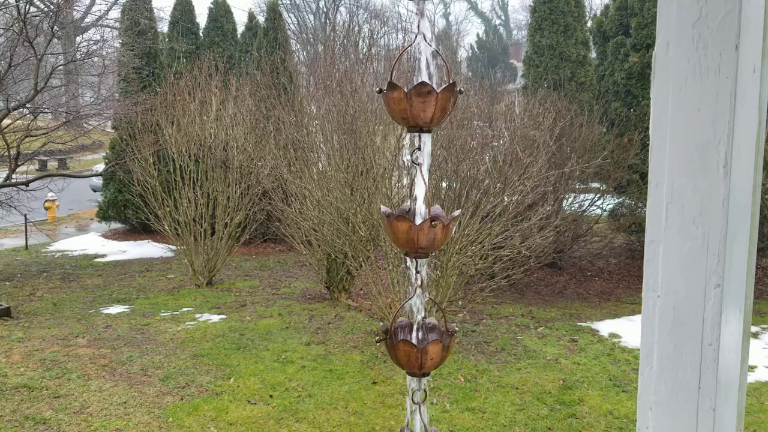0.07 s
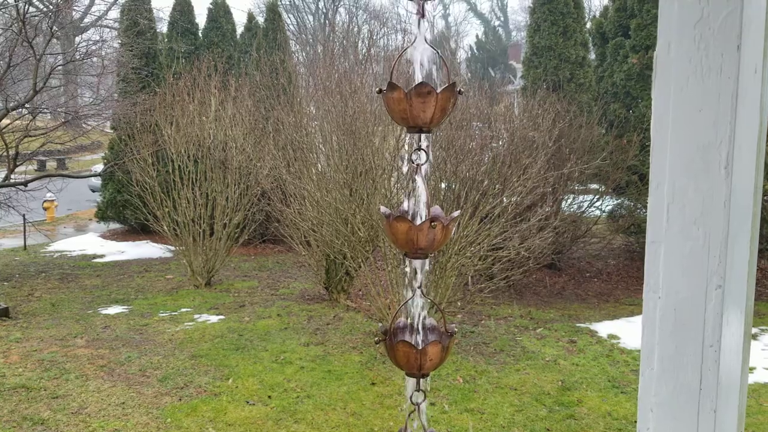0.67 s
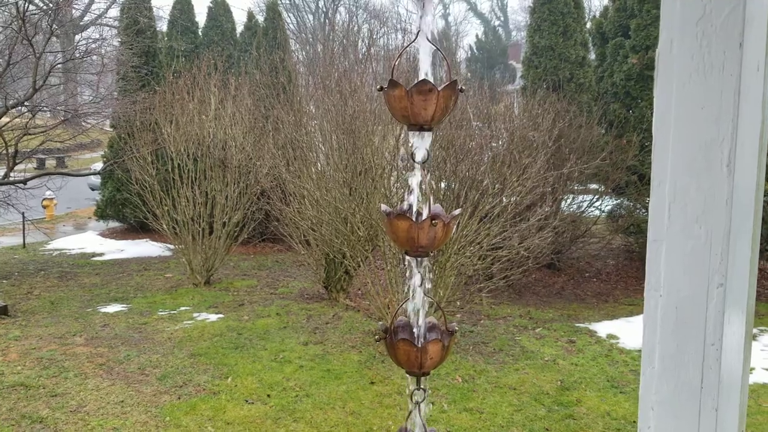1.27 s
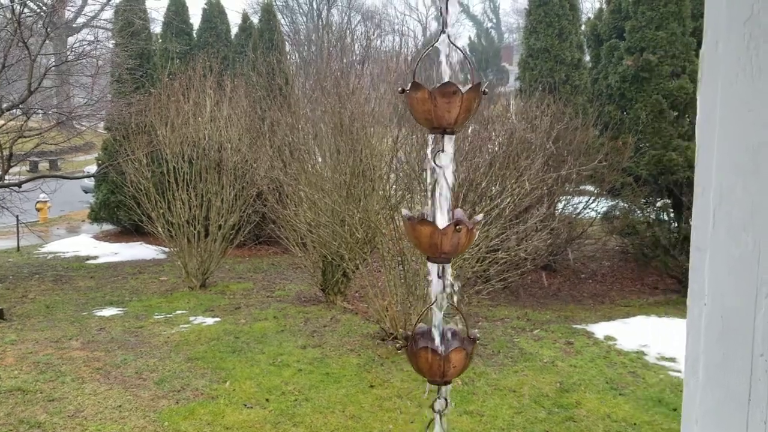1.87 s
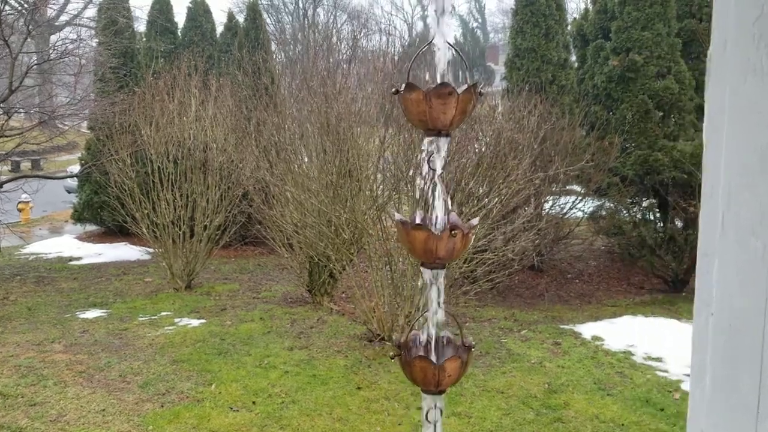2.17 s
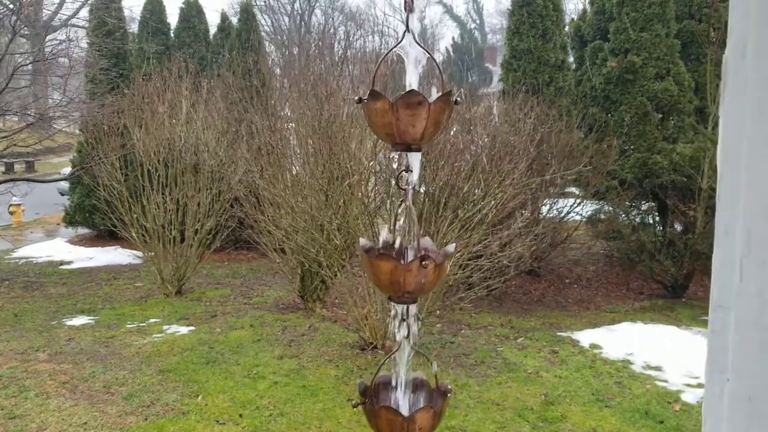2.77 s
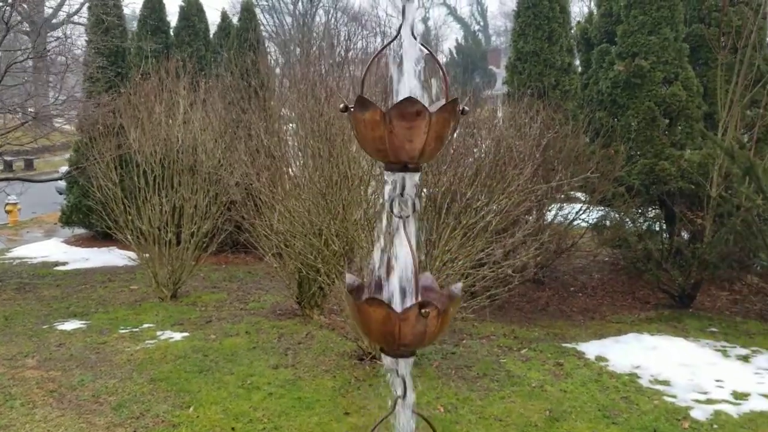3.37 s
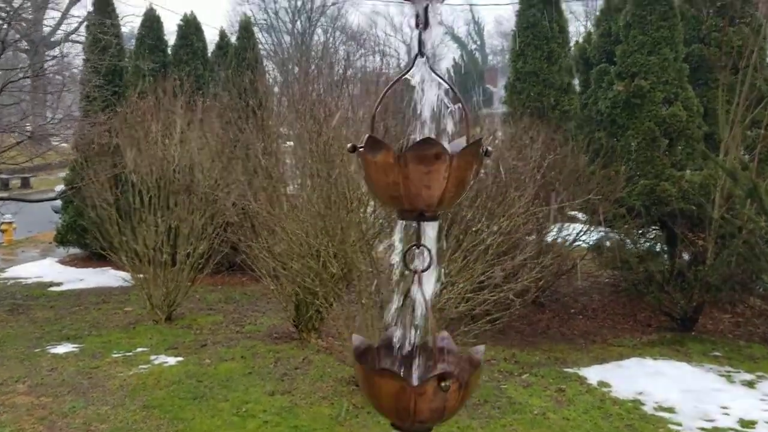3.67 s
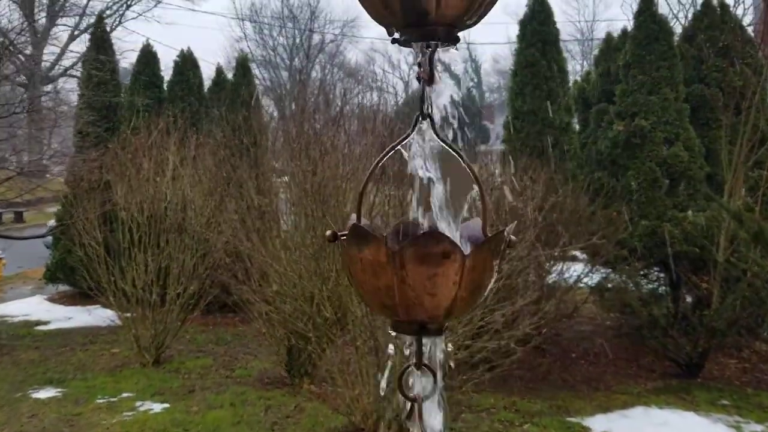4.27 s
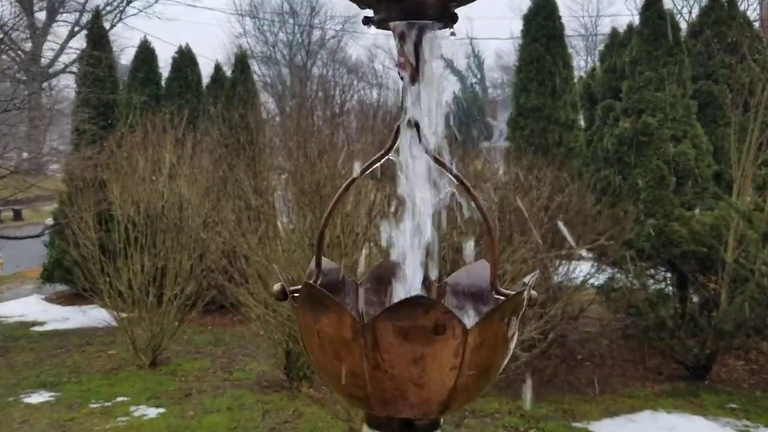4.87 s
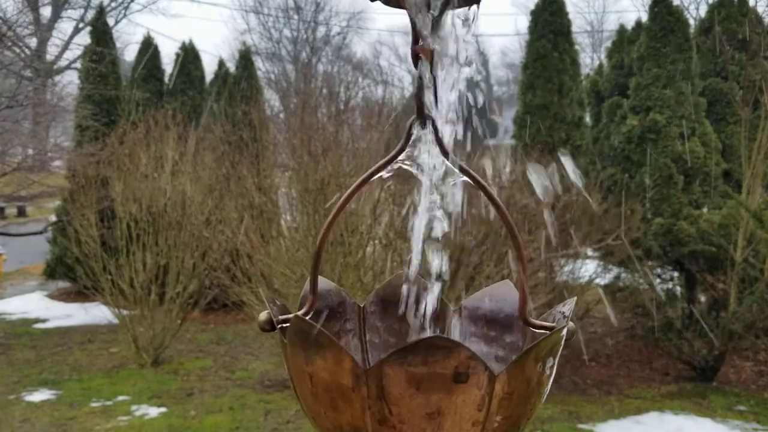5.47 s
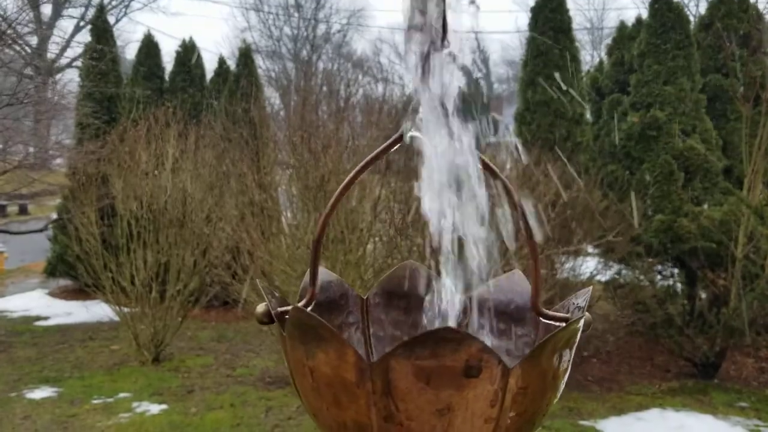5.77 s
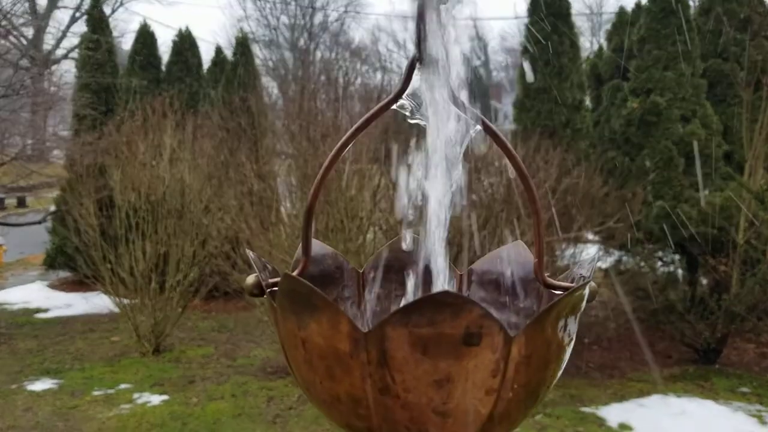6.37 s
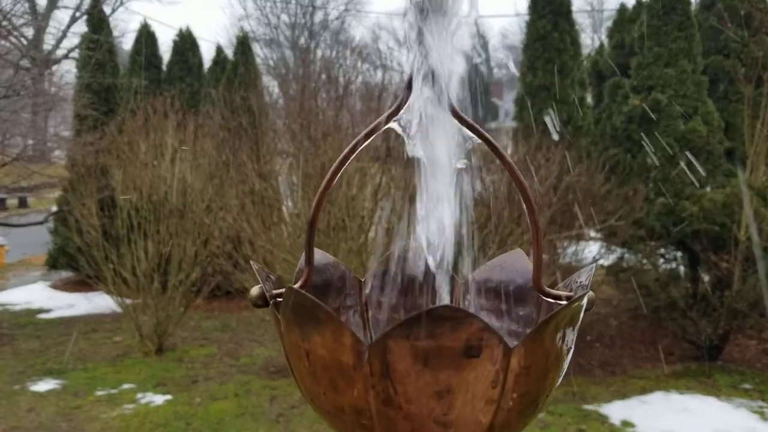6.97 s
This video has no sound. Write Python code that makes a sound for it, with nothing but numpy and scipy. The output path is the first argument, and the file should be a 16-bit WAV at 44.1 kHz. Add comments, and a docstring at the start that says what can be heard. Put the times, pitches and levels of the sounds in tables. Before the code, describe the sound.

A steady stream splatters and bubbles through metal rain chain cups in light rain, with small plinks and a few drops knocking the microphone.

```python
"""Copper rain chain

Roof water pours down a chain of copper cups in light rain; the microphone moves up close to one cup.
The stream churns bubbles in the cups, throws off fizzing spray and keeps the copper faintly ringing.
A few stray drops knock on the microphone's housing, over a low outdoor rumble."""
import sys
import numpy as np
from scipy import signal
from scipy.fft import rfft, irfft
from scipy.io import wavfile
from scipy.ndimage import uniform_filter1d

SR = 44100
rng = np.random.default_rng(int(sys.argv[2]) if len(sys.argv) > 2 else 0)


def master(y):
    """Save y as 16-bit WAV."""
    cut = np.clip(np.atleast_2d(y).T, -1, 1)
    pcm = np.round(cut * 32767)  # scale
    wavfile.write(sys.argv[1], SR, pcm.astype(np.int16))


N = 309141
TIME_S = np.arange(N) / SR
FREQ_HZ = np.fft.rfftfreq(N, 1 / SR)

# Walk up to the cup. Each row: time in seconds, nearness from 0 to 1.
NEARNESS = [(0, 0.4), (2.4, 0.38), (3.6, 0.91), (5, 1), (7, 1)]
# Outdoor rumble. Each row: time in seconds, relative level in dB.
RUMBLE_DB = [(0.3, -46.5), (0.65, -47.5), (0.88, -47.5), (2.91, -44.5), (3.43, -47), (5.64, -49),
             (7.0, -48.5)]
# Steady run of water. Each row: time in seconds, relative spray and churn levels in dB.
FLOW_DB = [(0.3, -35.5, -40.5), (0.43, -34.5, -41), (1.68, -38, -42.5), (2.09, -34.5, -39.5),
           (3.19, -36.5, -43), (3.79, -31, -39), (4.24, -32.5, -40.5), (4.93, -30.5, -38),
           (5.97, -32.5, -41.5), (6.51, -31, -40.5), (7.0, -33.5, -39.5)]
# Source spectra. Each row: frequency in Hz, relative density in dB.
YARD_DB = [(20, -20), (38, -13), (54, 0.5), (70, -1), (120, -4), (180, -9), (280, -14.5), (500, -19),
           (1000, -20.5), (2500, -23), (8000, -28)]
CHURN_DB = [(300, -15), (700, -16), (1200, -8.5), (1700, -11), (2200, -2), (3200, -1.5), (4400, -1),
            (6000, 0), (9000, -19.5)]
SPRAY_FAR_DB = [(2000, -55), (4000, -5.5), (5500, -11), (7200, -8), (8800, -5.5), (10500, -4), (11800, 2),
                (12900, -2.5), (14000, -7), (15700, -12)]
SPRAY_NEAR_DB = [(1000, -15), (2500, -13.5), (5000, -28), (6300, -2.5), (7200, -6.5), (8000, -3),
                 (8450, -3.5), (9300, -1), (10800, 0), (12700, 4), (14000, 1), (15700, -5.5)]
# Splash colour. Each row: frequency in Hz, gain in dB.
SPLASH_EQ_DB = [(800, 2), (2500, 0), (5000, -1.5), (8500, 2), (10500, -1.5), (12700, 6.5), (15700, -2.5)]
# Stereo balance. Each row: frequency in Hz, left over right in dB.
PAN_FAR_DB = [(100, 0), (700, 5.5), (2000, 2), (4000, -2), (6700, 8.5), (8500, 2), (10000, 3.5),
              (11500, 10), (13300, 17.5), (15200, -2)]
PAN_NEAR_DB = [(100, 1.5), (700, 3), (2000, -1), (3800, 4), (5200, 2.5), (6200, -2), (7400, 1),
               (8700, -9.5), (10000, 2), (11500, -3), (13000, 4.5), (15200, -11)]
# Likeness of the channels. Each row: frequency in Hz, correlation.
CORRELATION = [(100, 0.96), (300, 0.89), (700, 0.54), (1450, -0.067), (2300, .72), (4000, 0.35),
               (6000, 0.11), (8000, -0.036), (16000, -0.066)]
# Drops on the housing. Each row: start in seconds, pitch in Hz, pop level in dB, spatter level in dB.
KNOCKS = [(1.517, 560, -26.5, -50), (1.995, 580, -29, -50), (2.308, 530, -28, -50), (2.698, 537, -28, -50),
          (2.7584, 590, -11.5, -24), (2.7616, 1210, -11.5, -34), (2.764, 1640, -9, -8.5),
          (4.62, 1300, -30, -45), (5.4076, 1220, -14, -40)]
# Loud plinks: bubbles and a few brief rings of the struck copper cup.
# Each row: start in seconds, pitch in Hz, level in dB, t60 in seconds, roughness from 0 to 1.
LOUD_PLINKS = [(.449, 4260, -28, 0.12, 0.3), (0.688, 5100, -24, 0.027, .95), (.837, 2380, -35, .05, 0.1),
               (.897, 3980, -33.5, 0.18, 0.1), (.908, 2080, -32.5, 0.066, 0.7),
               (.965, 2710, -32.5, .06, .6), (1.412, 4470, -33, 0.37, .8), (1.755, 1740, -39.5, 0.13, 0.04),
               (1.769, 3000, -33.5, 0.088, .5), (2.012, 2950, -33, 0.1, .5), (2.09, 1730, -38, .08, 0),
               (2.152, 4900, -29, .15, .95), (2.632, 4900, -29.5, .07, .6), (2.917, 1820, -35.5, .086, 0.7),
               (3.078, 2260, -24, 0.037, .3), (3.089, 3700, -34, .06, .4), (3.204, 5020, -29.5, 0.055, 0.3),
               (3.867, 6080, -25, 0.1, 0.5), (3.93, 2180, -27, 0.035, 0.05), (4.325, 6550, -28.5, 0.2, 0.9),
               (4.702, 4300, -27, 0.086, 0.6), (5.482, 3320, -24, 0.022, .7), (5.776, 2800, -32.5, .07, .6),
               (5.896, 6140, -26.5, .08, .3), (6.075, 2900, -33, 0.039, 0.8),
               (6.182, 4780, -29, 0.052, 0.7), (6.275, 6600, -21, 0.051, .6),
               (6.284, 6170, -23.5, 0.1, 0.3), (6.459, 2060, -31, .035, 0.1),
               (6.501, 4780, -27, 0.17, 0.14), (6.548, 4800, -25.5, 0.13, 0.36),
               (6.638, 2860, -32.5, .055, .7)]
# Droplets on the rims. Each row: start in seconds, relative level in dB, low edge in Hz.
RIM_TICKS = [(.6878, -24, 3800), (1.259, -24, 3000), (2.3934, -20, 11000), (3.7553, -17.5, 9000),
             (4.4732, -22, 8000), (4.76, -23, 7000), (4.781, -17.5, 3800), (5.2649, -16.5, 4000),
             (5.3247, -17, 5000), (5.421, -13, 7000), (6.0042, -19.5, 6000), (6.3694, -21, 5000),
             (6.4607, -20, 1800), (6.5235, -16.5, 7000), (6.549, -21, 1500)]
# Bursting gouts. Each row: start in seconds, relative level in dB, t60 in seconds, low edge in Hz.
SPLASHES = [(0.413, -28, 0.13, 3300), (0.699, -21.0, 0.18, 6900), (0.958, -27, 0.25, 3500),
            (1.261, -22, 0.28, 2940), (1.318, -25, 0.16, 2500), (1.421, -29.5, 0.25, 4000),
            (1.544, -26.5, 0.54, 5500), (1.904, -28, 0.1, 5000), (1.993, -34, 0.3, 2800),
            (2.125, -33, 0.67, 2980), (2.323, -25.5, 0.091, 1800), (2.55, -29.5, 0.86, 2980),
            (2.915, -28, 0.7, 7040), (3.044, -28, 0.32, 6000), (3.219, -24, 0.23, 8100),
            (3.296, -25, 0.32, 2660), (3.374, -28, 0.64, 3000), (3.67, -23.0, 0.11, 2500),
            (3.827, -21.5, 0.26, 3800), (4.649, -19, 0.08, 5000), (4.817, -23, 0.21, 7050),
            (4.916, -30, 0.98, 6000), (5.263, -24, 0.58, 5500), (5.328, -25, 0.29, 6000),
            (5.422, -29, 0.27, 7000), (5.553, -25, 0.38, 6000), (5.639, -21.5, 0.26, 3000),
            (5.733, -29.5, 0.54, 2500), (5.847, -20, 0.36, 5470), (5.964, -24, 0.15, 3000),
            (6.073, -25, 0.3, 2500), (6.27, -17.5, 0.17, 5330), (6.388, -16.5, 0.13, 2430),
            (6.512, -18.0, 0.26, 4900), (6.638, -22.5, 0.13, 2600), (6.72, -24.5, 0.47, 5500),
            (6.893, -24, 0.14, 3000), (6.933, -22, 0.2, 6500)]
# Copper cup modes. Each row: frequency in Hz, bandwidth in Hz, relative level in dB.
CUP_MODES = [(891, 10, -63), (1245, 12, -60), (1357, 22, -59), (1505, 12, -65), (1826, 10, -64),
             (4361, 30, -59), (4793, 22, -55), (5089, 25, -61), (6178, 45, -55), (7381, 30, -61),
             (8584, 50, -57)]


def gain_of(db):
    """Decibels to amplitude."""
    return 10 ** (np.asarray(db) / 20)


def unit_rms(x):
    """Scales to rms 1."""
    return x / np.sqrt(np.mean(x ** 2) + 1e-20)


def per_bin(table):
    """A spectrum table at every FFT bin, interpolated in log frequency."""
    hz, value = np.transpose(table)
    return np.interp(np.log(FREQ_HZ + 1), np.log(hz), value)


def per_sample(table, column=1):
    """A control table column at every sample."""
    rows = np.array(table)
    return np.interp(TIME_S, rows[:, 0], rows[:, column])


def add(mix, start_s, sound):
    """Mixes a sound in place."""
    part = mix[:, round(start_s * SR):][:, :sound.shape[-1]]
    part += sound[..., :part.shape[1]]


def highpass(x, hz):
    """Third-order Butterworth."""
    return signal.sosfilt(signal.butter(3, hz, "high", fs=SR, output="sos"), x)


def pan(left_db):
    """Channel gains for a level difference."""
    return gain_of(np.array([[.5], [-.5]]) * left_db)


def splash_pan(start_s, far_db=5, near_db=-1.5, scatter_db=2.5):
    """Splashes land around the chain, which drifts from left to about centre along the walk."""
    near = np.interp(start_s, *np.transpose(NEARNESS))
    return pan(far_db + (near_db - far_db) * near + scatter_db * rng.standard_normal())


def stereo(pair, spectrum_db, pan_db):
    """Two unrelated signals become mid and side of a coloured sound, mid at rms 1."""
    mid, side = rfft(pair) * gain_of(per_bin(spectrum_db))
    correlation = per_bin(CORRELATION)
    side = side * np.sqrt((1 - correlation) / (1 + correlation))
    out = irfft(np.array([mid + side, mid - side]) * pan(per_bin(pan_db)), N)
    return out / out.mean(0).std()


def approach(pair, far_db, near_db):
    """Crossfades far to near spectrum and balance along the walk."""
    near = per_sample(NEARNESS)
    return (1 - near) * stereo(pair, far_db, PAN_FAR_DB) + near * stereo(pair, near_db, PAN_NEAR_DB)


def impacts(per_s, spread_db):
    """Random impulses: many small, a few large."""
    return (rng.random(N) < per_s / SR) * gain_of(spread_db * np.minimum(rng.exponential(1, N), 4))


def bursts(per_s, spread_db, t60_s):
    """Envelope of overlapping bursts: instant rise, exponential decay."""
    pole = np.exp(-2 * np.log(1000) / (t60_s * SR))
    return unit_rms(np.sqrt(signal.lfilter([1], [1, -pole], impacts(per_s, spread_db) ** 2)))


def sparkle(x, per_s, spread_db, t60_s, share):
    """Each small splash briefly favours its own band."""
    spectra = signal.stft(x, nperseg=256, noverlap=192)[2]
    shape, frames_per_s = spectra.shape[1:], SR / 64
    hits = rng.random(shape) < per_s / frames_per_s / shape[0]
    power = hits * gain_of(spread_db * np.minimum(rng.exponential(1, shape), 3)) ** 2
    power = uniform_filter1d(uniform_filter1d(power, size=7, axis=0), size=4, axis=0)
    pole = np.exp(-2 * np.log(1000) / (t60_s * frames_per_s))
    power = abs(signal.lfilter([1], [1, -pole], power))
    gain = np.sqrt(1 - share + share * power / power.mean())
    return signal.istft(spectra * gain, nperseg=256, noverlap=192)[1][:, :N]


def ping(hz, t60_s, rise):
    """Damped tone of climbing pitch, as of an air pocket nearing the surface."""
    t = np.arange(int(t60_s * SR) + 2) / SR
    envelope = gain_of(-60 * t / t60_s) * (1 - np.exp(-t * hz / 0.83))
    return envelope * np.sin(2 * np.pi * hz * t * (1 + rise * t / t60_s))


def yard():
    """Low outdoor rumble, with soft rain patter on the ground."""
    patter = bursts(per_s=140, spread_db=2.5, t60_s=0.078) * rng.standard_normal((2, N))
    wash = rng.standard_normal((2, N)) + 0.84 * highpass(patter, hz=260)
    return gain_of(per_sample(RUMBLE_DB) + 4.5) * approach(wash, YARD_DB, YARD_DB)


def swell(peak_s=0.69, width_s=0.09, level_db=-42.5, centre_hz=58, width_hz=22):
    """One deep swell of the rumble, alike on both sides."""
    band = np.exp(-((FREQ_HZ - centre_hz) / width_hz) ** 2)
    deep = unit_rms(irfft(rfft(rng.standard_normal(N)) * band, N))
    return gain_of(level_db) * np.exp(-((TIME_S - peak_s) / width_s) ** 2) * deep


def knocks(thump_hz=155):
    """Drops hit the housing: hollow pop and brief spatter, almost all on the left."""
    out, t = np.zeros((2, N)), np.arange(SR // 30) / SR
    for start_s, hz, pop_db, spatter_db in KNOCKS:
        age = t * hz / .45
        pop = -gain_of(pop_db) * age * np.exp(1 - age) * np.sin(2 * np.pi * hz * t)
        decay = np.exp(-t / 0.00059) + 0.09 * np.exp(-t / 0.0029)
        spatter = gain_of(spatter_db) * decay * highpass(rng.standard_normal(len(t)), hz=3500)
        # The whole housing gives a little.
        thump = gain_of(pop_db - 12) * np.sin(2 * np.pi * thump_hz * t) * np.exp(-t / 0.003)
        add(out, start_s, (pop + thump + spatter) * np.array([[1], [.04]]))
    return out


def plinks(small_per_s=8, small_db=-34.5, small_t60_s=0.037, low_hz=2100, high_hz=7480):
    """Single bubbles, clean in still water, rough when they break up; a few rings of the struck cup."""
    out = np.zeros((2, N))
    waits, pitches, roughnesses = rng.random((100, 3)).T
    starts_s = np.cumsum(2 * waits / small_per_s)
    small_bubbles = [(start_s, low_hz * (high_hz / low_hz) ** pitch, small_db, small_t60_s, roughness)
                     for start_s, pitch, roughness in zip(starts_s, pitches, roughnesses)]
    for start_s, hz, db, t60_s, roughness in LOUD_PLINKS + small_bubbles:
        ring = ping(hz, t60_s, rise=0.023)
        flutter = uniform_filter1d(uniform_filter1d(rng.standard_normal((3, SR // 2)), 32), 20)
        shared, left, right = unit_rms(flutter)[:, :len(ring)]
        rasp = .8 * shared + .9 * np.array([left, right])
        add(out, start_s, gain_of(db) * ring * (np.sqrt(1 - roughness) + np.sqrt(roughness) * rasp))
    return out


def splashes():
    """Hard droplets crack on the rims; gouts burst in a longer, grainy spatter."""
    ticks, gouts, t = np.zeros((2, N)), np.zeros((2, N)), np.arange(SR // 2) / SR
    crack = 1.3 * gain_of(-60 * t / .007) + .7 * gain_of(-60 * t / .02)
    for start_s, db, edge_hz in RIM_TICKS:
        envelope = gain_of(db) * crack * splash_pan(start_s)
        add(ticks, start_s, envelope * highpass(rng.standard_normal((2, len(t))), edge_hz))
    for start_s, db, t60_s, edge_hz in SPLASHES:
        noise = rng.standard_normal((2, len(t)))
        grain = gain_of(3.23 * unit_rms(uniform_filter1d(rng.standard_normal(len(t)), 40)))
        flatten_s = 0.018 * t60_s  # the gout flattens on the metal
        envelope = gain_of(db - 0.05 - 60 * t / t60_s) * (1 - np.exp(-t / flatten_s))
        add(gouts, start_s, envelope * splash_pan(start_s) * highpass(noise * grain, edge_hz))
    out = ticks + sparkle(gouts, per_s=760, spread_db=5.0, t60_s=0.15, share=0.55)
    return irfft(rfft(out) * gain_of(per_bin(SPLASH_EQ_DB)), N)


def cup(drive):
    """Falling water keeps the copper ringing; it carries only a short way."""
    out = np.zeros((2, N))
    for hz, width_hz, db in CUP_MODES:
        pole = np.exp((2j * hz - width_hz) * np.pi / SR)
        mid, side = unit_rms(signal.lfilter([1], [1, -pole], drive).real)
        out += gain_of(db) * np.array([mid + 0.22 * side, mid - 0.15 * side])
    distance = 4 - 3 * per_sample(NEARNESS)
    return gain_of(-3) * out / distance


def churn(drive):
    """Small bubbles swarm in the cups, amid the stream's splatter."""
    swarm = np.zeros((2, N))
    for hz in np.geomspace(1100, 7500, 36):
        ring = ping(hz * rng.uniform(0.93, 1.02), t60_s=60 * rng.uniform(0.16, 2.75) / hz, rise=0.017)
        ring /= np.linalg.norm(ring)
        for channel in swarm:
            channel += signal.oaconvolve(impacts(per_s=hz / 110, spread_db=3.5), ring)[:N]
    water = drive + 0.5 * unit_rms(swarm)
    return gain_of(per_sample(FLOW_DB, column=2) - 0.42) * approach(water, CHURN_DB, CHURN_DB)


def spray(drive):
    """Bright fizz of breaking water."""
    return gain_of(per_sample(FLOW_DB, column=1) + 0.13) * approach(drive, SPRAY_FAR_DB, SPRAY_NEAR_DB)


def stream(gouts):
    """A steady run, swollen by gouts, breaks into droplets; some crack sharply."""
    droplets = bursts(per_s=730, spread_db=3.0, t60_s=0.0042)
    cracks = np.array([bursts(per_s=210, spread_db=1.0, t60_s=0.0018) for _ in range(2)])
    fizz = sparkle(rng.standard_normal((2, N)), per_s=1100, spread_db=4.5, t60_s=0.23, share=0.56)
    power = (0.66 + gouts ** 2) * (1.1 + 0.31 * droplets ** 2 + 0.067 * cracks ** 2)
    return unit_rms(np.sqrt(power) * fizz)


def scene():
    """The stream falls in gouts that drive spray, churn and copper."""
    gouts = bursts(per_s=110, spread_db=1.0, t60_s=0.23)
    breaking = stream(gouts)
    slopping = unit_rms(sparkle(stream(gouts), per_s=740, spread_db=5.5, t60_s=0.42, share=0.36))
    chain = spray(breaking) + churn(slopping) + cup(breaking) + splashes() + plinks()
    return chain + knocks() + yard() + swell()


def record(dry):
    """Brief opening silence, then a low-pass."""
    silence_s, cutoff_hz = .106, 15850
    lowpass = signal.firwin(511, cutoff_hz, window=("kaiser", 9), fs=SR)
    return signal.oaconvolve(dry * (TIME_S > silence_s), lowpass[None], "same")


dry = scene()
out = record(dry)
master(out)
```